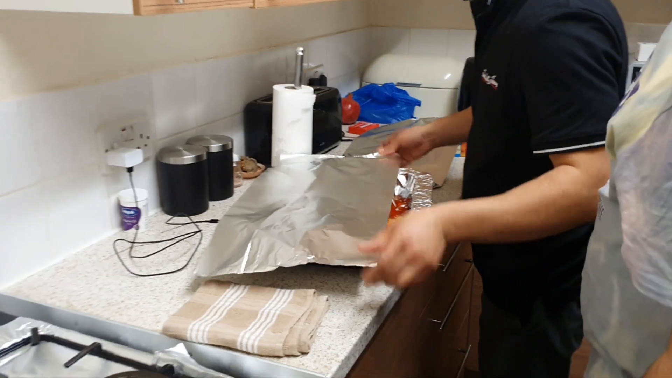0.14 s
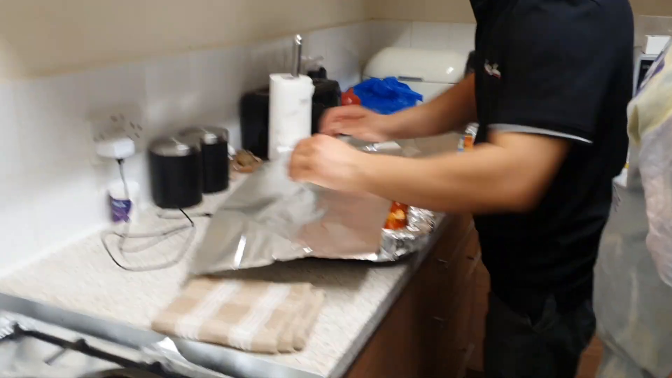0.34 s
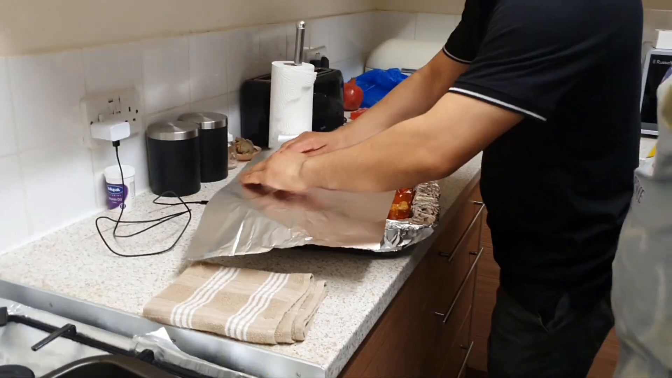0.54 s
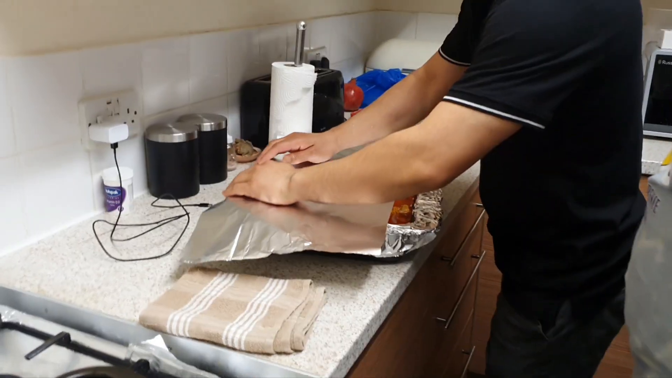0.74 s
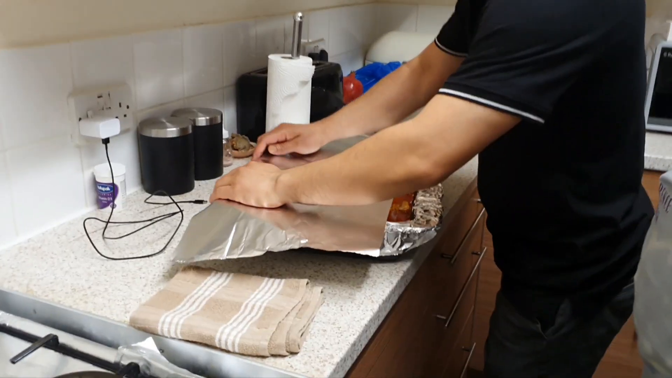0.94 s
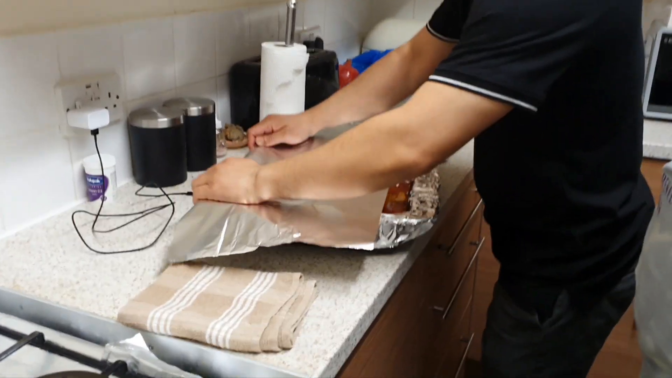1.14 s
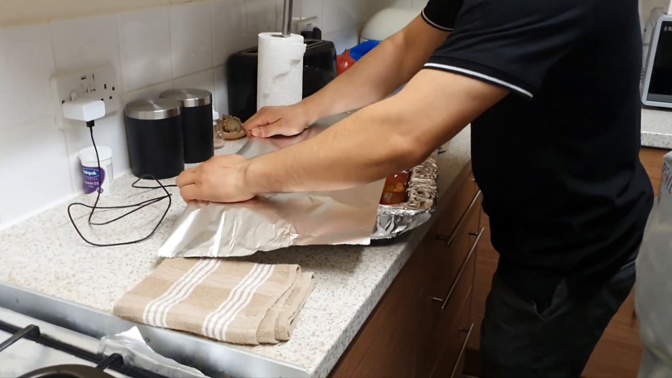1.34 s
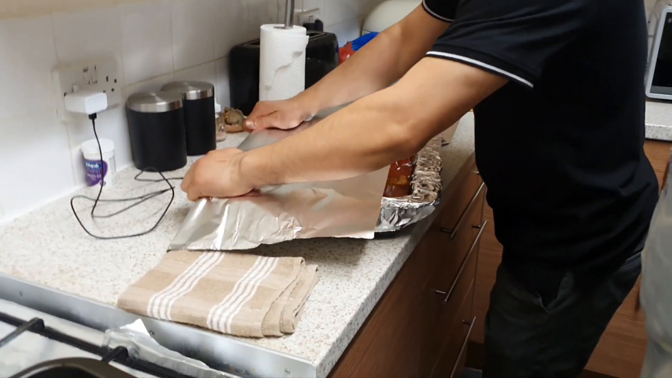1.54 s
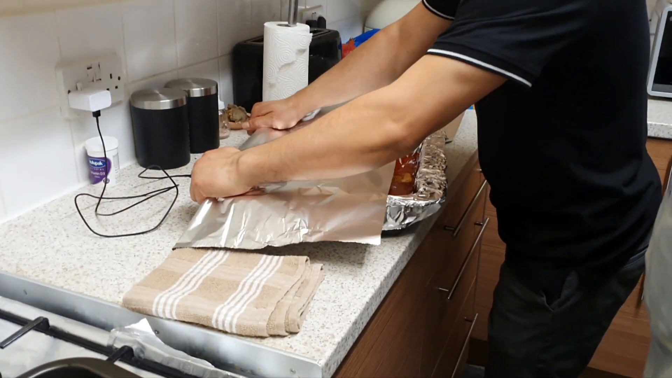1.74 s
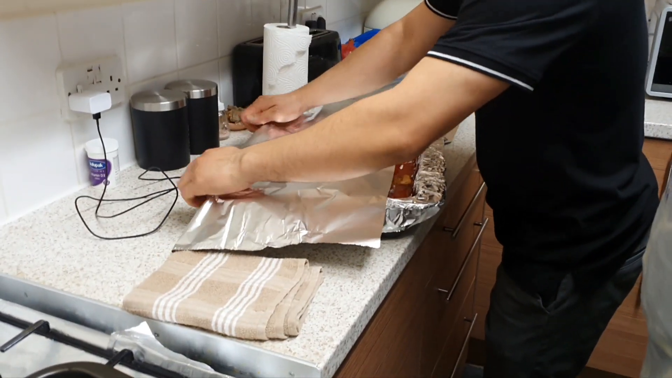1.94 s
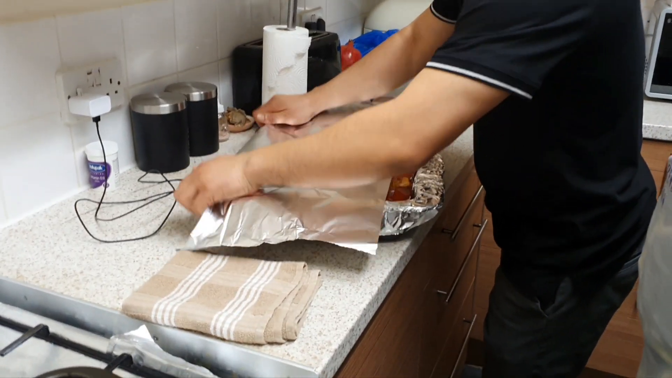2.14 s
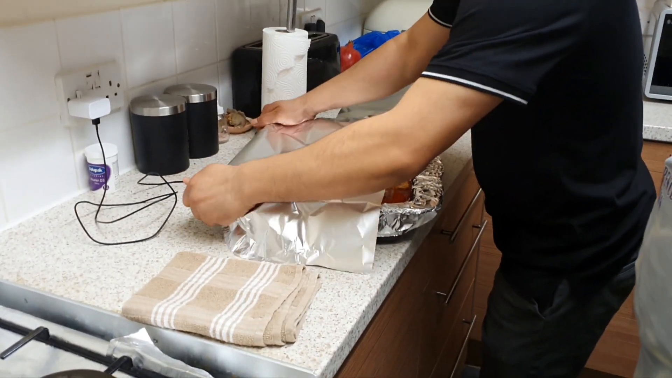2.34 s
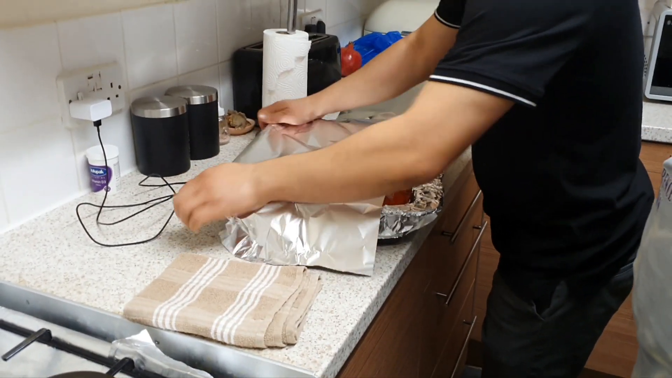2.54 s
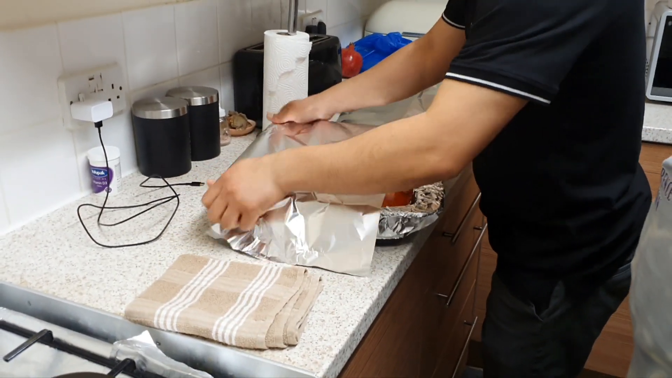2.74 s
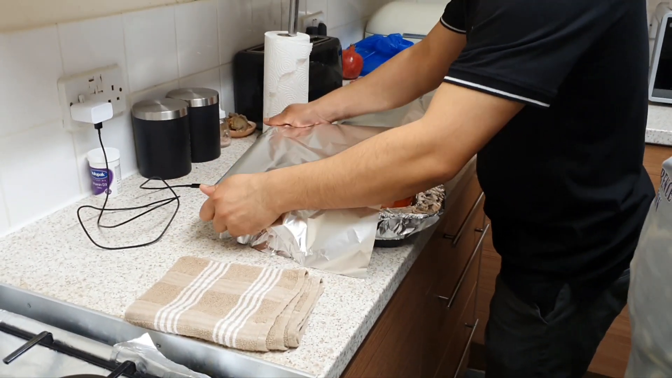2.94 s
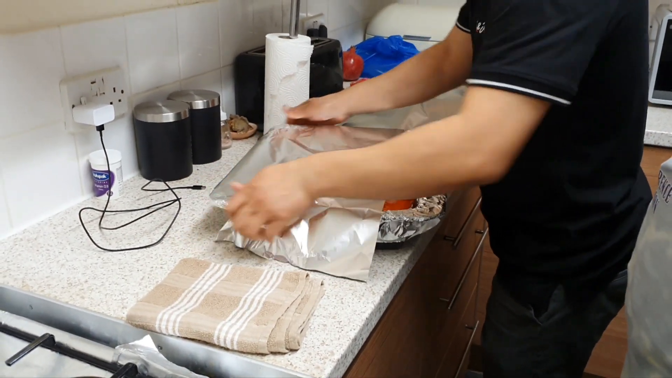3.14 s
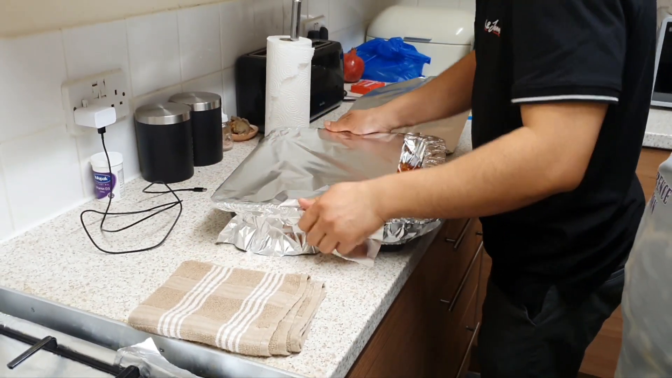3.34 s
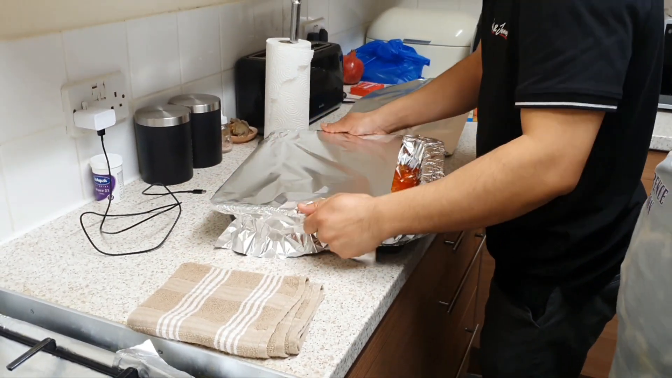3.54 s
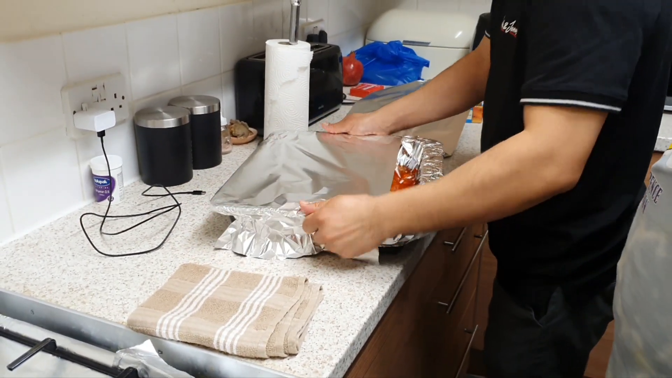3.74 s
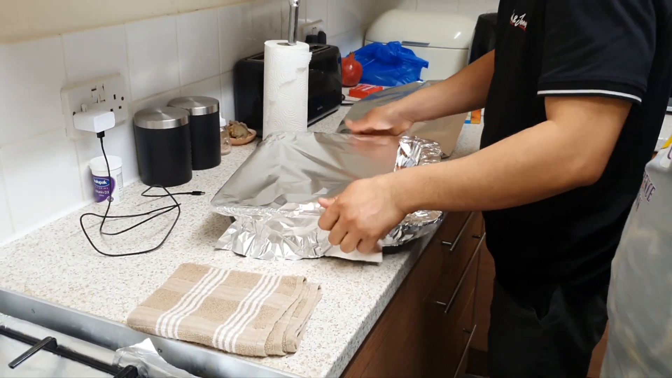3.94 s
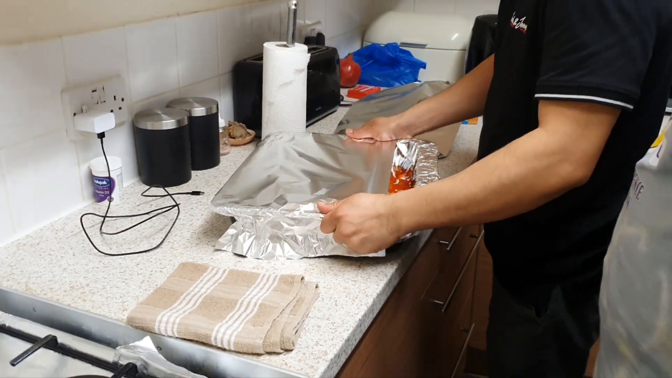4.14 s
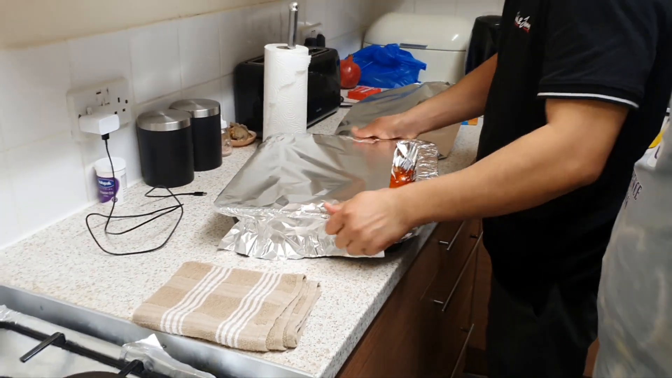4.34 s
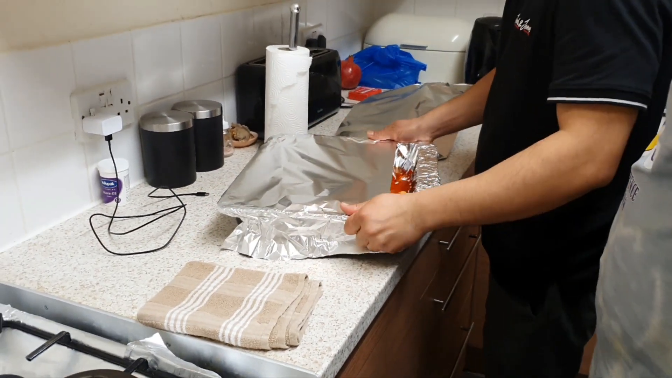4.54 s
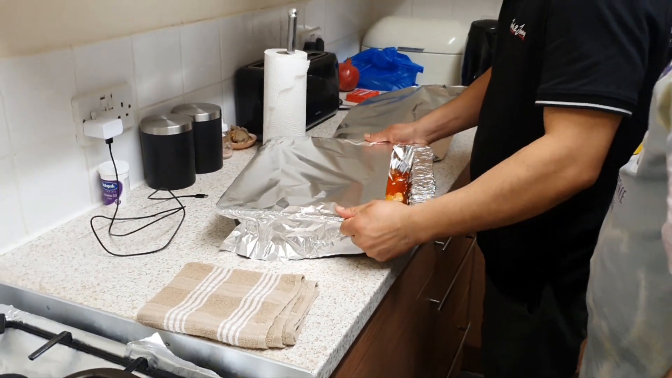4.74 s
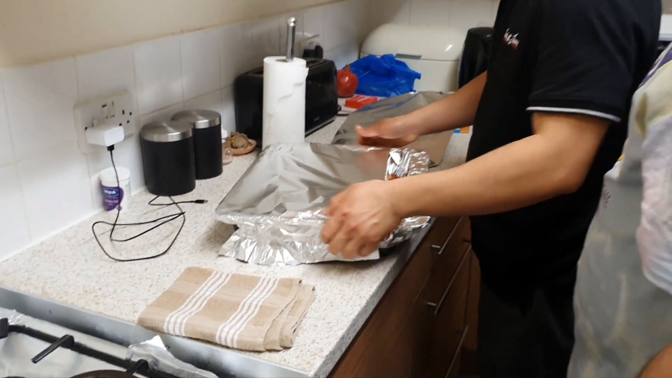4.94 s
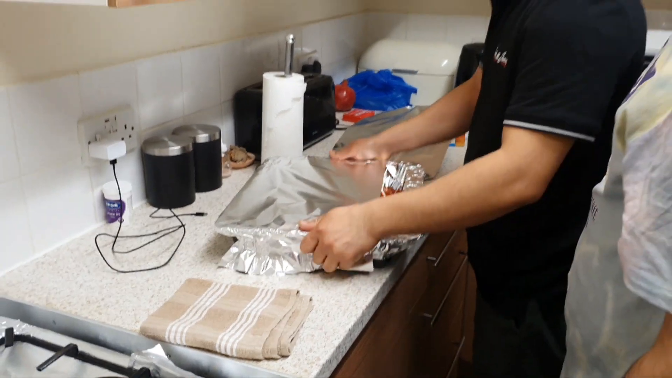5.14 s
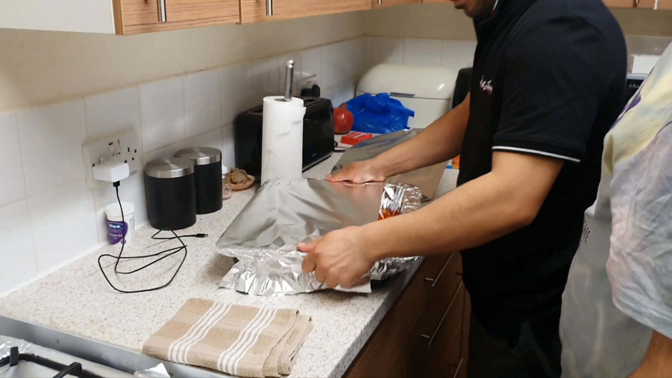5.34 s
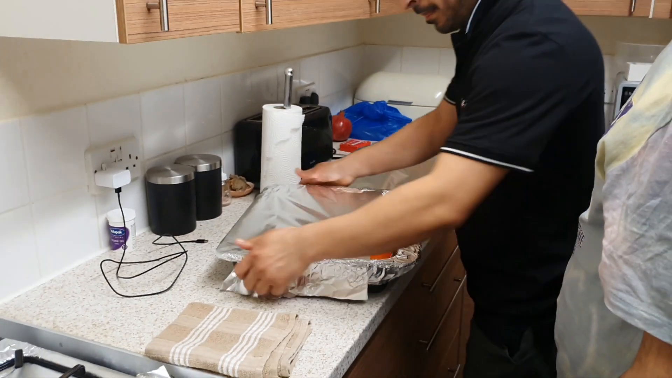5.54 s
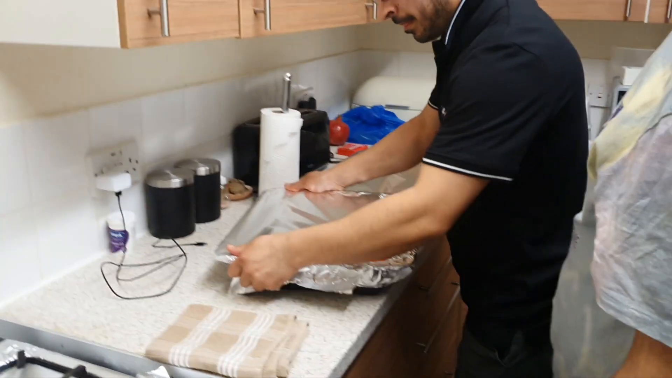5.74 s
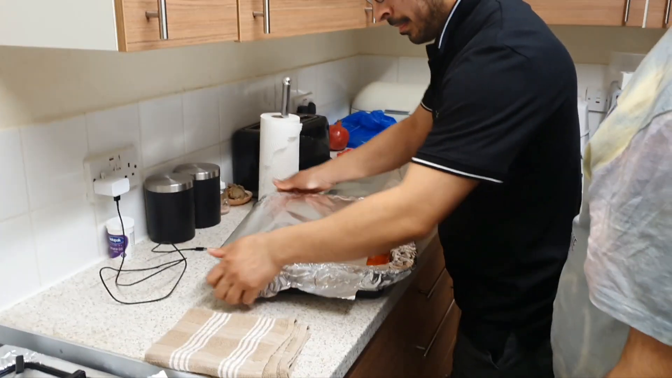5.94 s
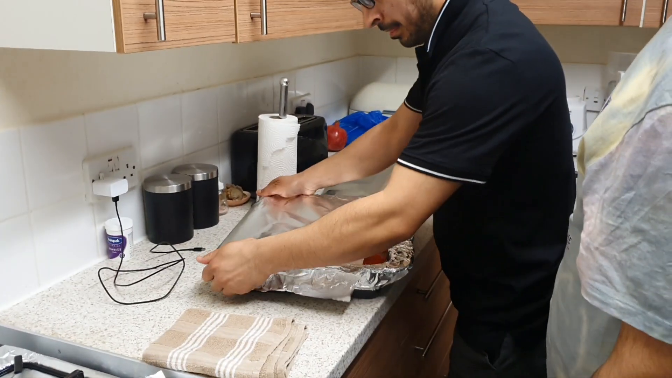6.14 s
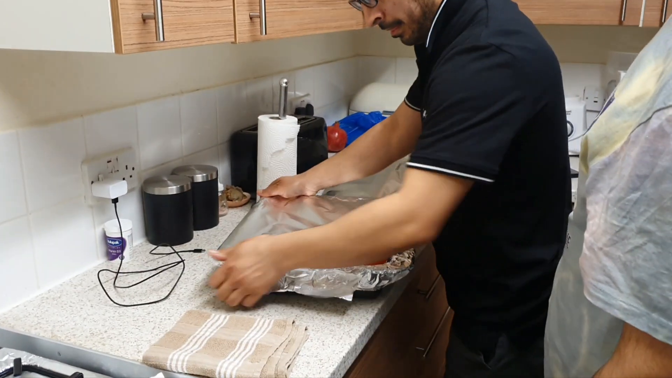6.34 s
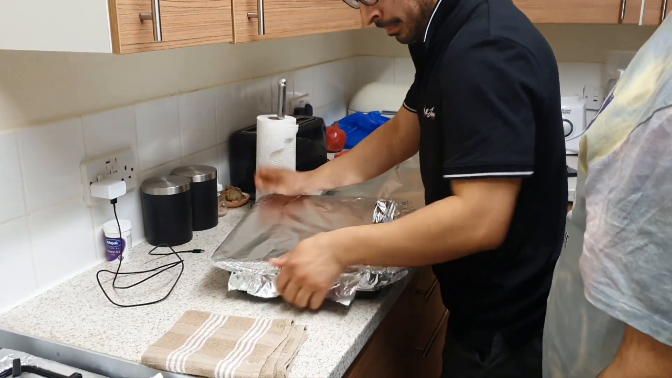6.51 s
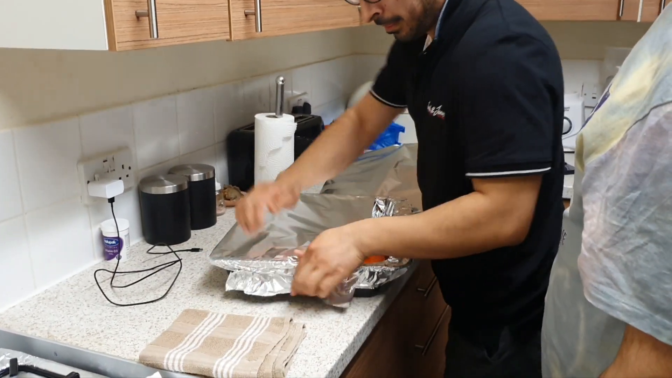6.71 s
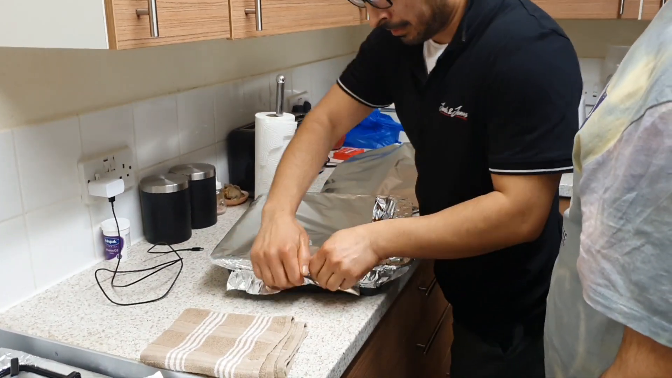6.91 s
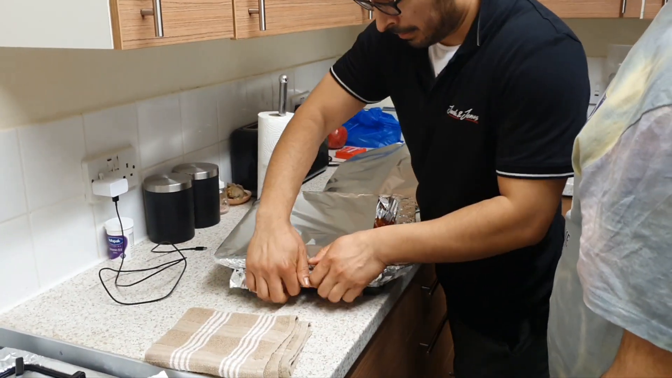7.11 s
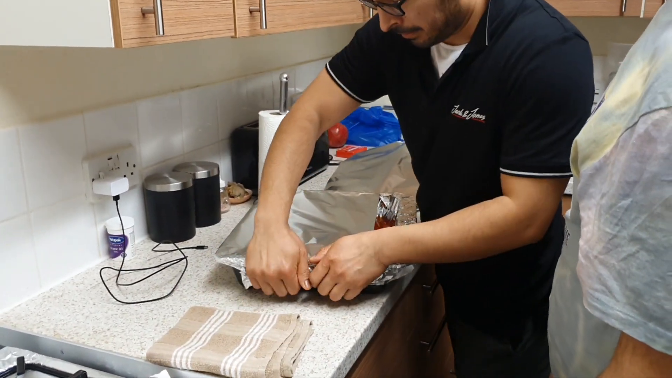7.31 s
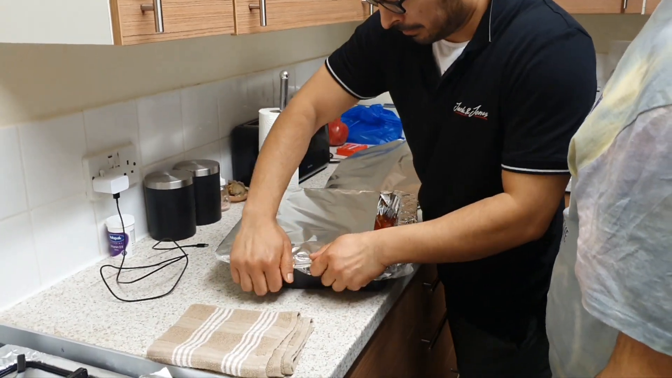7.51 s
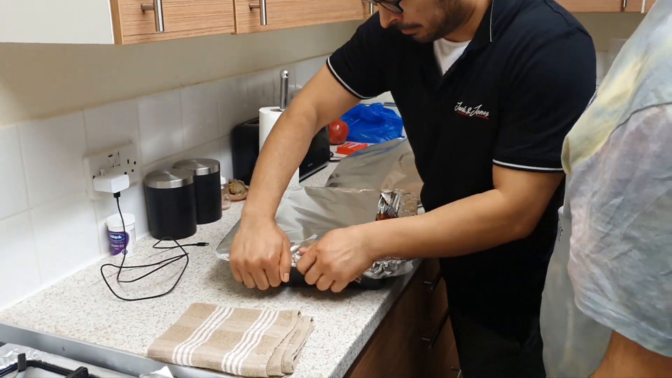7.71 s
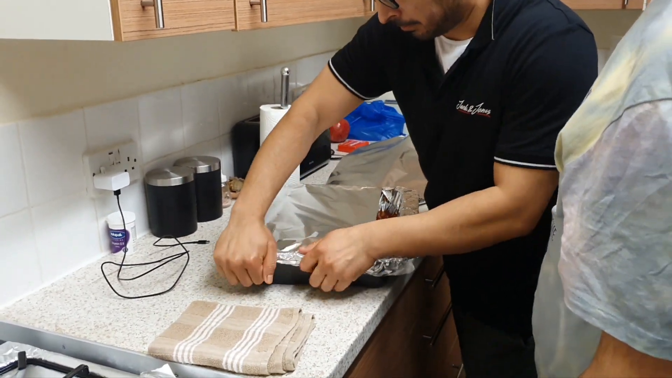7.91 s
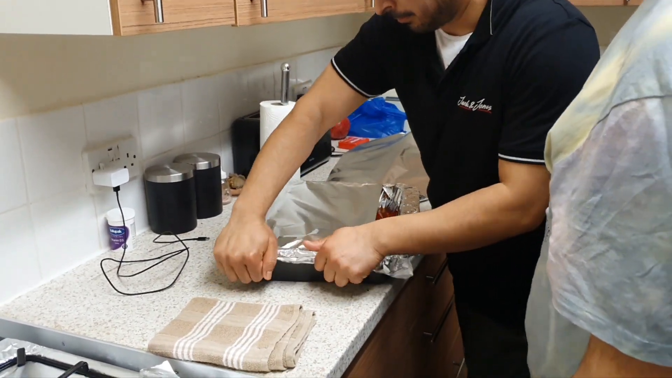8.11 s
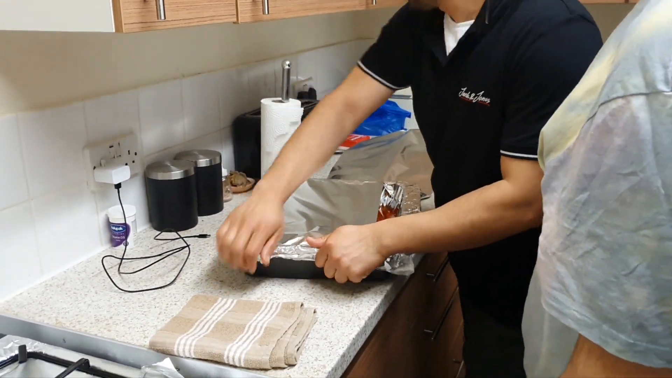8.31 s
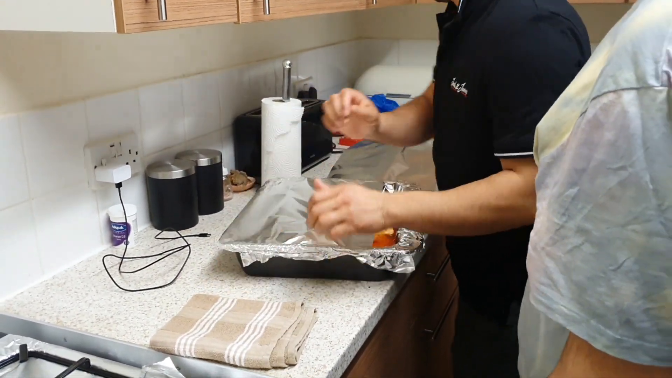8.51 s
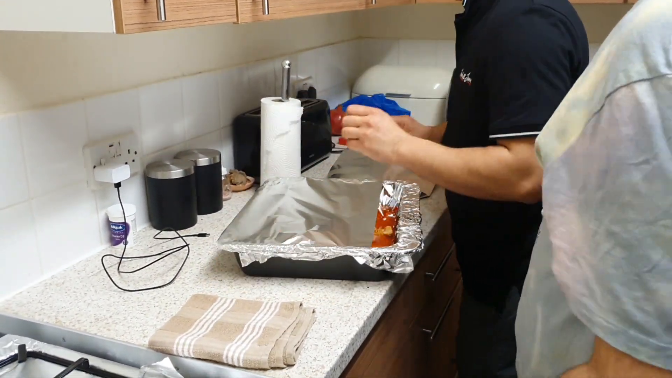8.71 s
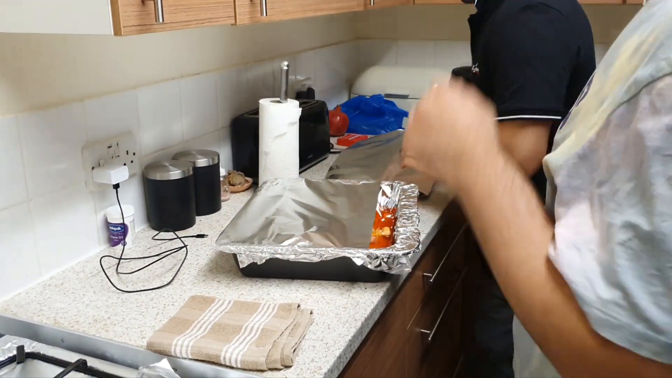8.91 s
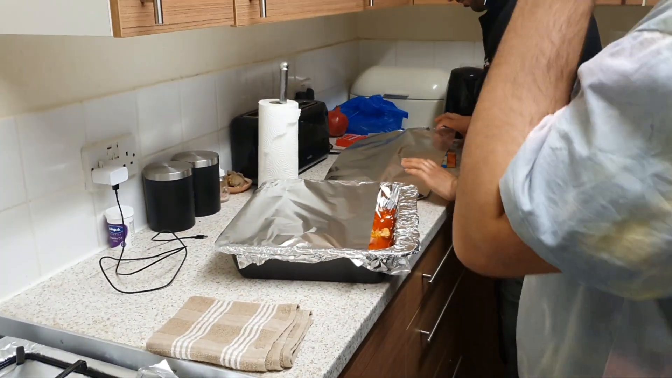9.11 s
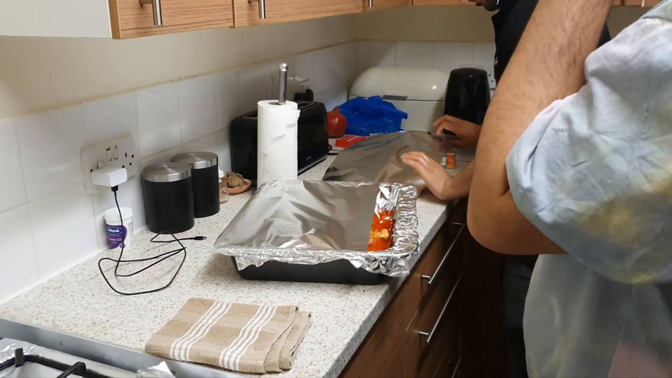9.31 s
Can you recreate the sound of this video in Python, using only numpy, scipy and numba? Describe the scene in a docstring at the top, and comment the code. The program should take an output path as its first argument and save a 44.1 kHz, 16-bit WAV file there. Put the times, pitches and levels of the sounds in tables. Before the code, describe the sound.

Crisp, uneven crinkling of aluminium foil comes from close by and slightly left, as it is smoothed and folded over a tray. Each grip sets off a spray of tiny snaps, loudest early in the middle, and later presses add soft thuds from the tray. The crackle thins out near the end. The small kitchen adds a brief echo, a quiet hum and a faint deep rumble that comes and goes.

```python
"""Crimping foil over a tray

Hands pull aluminium foil over a tray on a kitchen counter and crimp it round the rim. Thousands of
creases snap, each a short ring: small ones high, broad panels low. A grip sets off an avalanche of
snaps; a palm buckles the panels and thuds the tray. Tiled walls echo the foil over a quiet hum and
a deep rumble that comes and goes."""
import sys
import numpy as np
from scipy import signal
from scipy.fft import rfft, irfft, next_fast_len
from scipy.io import wavfile
from numba import njit

SR = 44100
rng = np.random.default_rng(int(sys.argv[2]) if len(sys.argv) > 2 else 0)


def wav_record(signal):
    """Record a signal, one row per channel, as 16-bit PCM in the file named by sys.argv[1]."""
    frames = np.transpose(np.atleast_2d(signal))
    bounded = np.clip(frames, -1, 1)
    # unit amplitude maps onto the largest positive 16-bit level
    quanta = np.round(bounded * 32767).astype(np.int16)
    wavfile.write(sys.argv[1], SR, quanta)


N = 417186

# Tone of the appliance hum: pitch_hz, gain_db
HUM_TONE = [(26, -35), (45, 7), (97, 5), (172, -1), (200, -9), (260, -27), (440, -120)]
# Tone of the room air: pitch_hz, gain_db
AIR_TONE = [(120, -31), (200, 6), (448, 4.5), (2470, -3), (6280, -12), (8270, -30), (16000, -30)]
# Noise bands of the rumble: pitch_hz, width_hz, level_db
RUMBLE_BANDS = [(37, 9, 0), (62, 25, -9)]
# Swells of the rumble: crest_s, gain_db
BOOMS = [(0.55, -70), (0.9, -83), (2.56, -71), (2.78, -69), (3.2, -58), (3.46, -56), (3.68, -61),
         (4.01, -63), (4.53, -57), (5.15, -50), (5.64, -53.5), (6.07, -52), (6.2, -56), (6.99, -61),
         (7.4, -60), (7.82, -55), (8.08, -65), (8.67, -77)]
# How much louder the left side is than the right: pitch_hz, difference_db
LEFT_OVER_RIGHT = [(60, 3.5), (110, -0.5), (200, 2.5), (380, 1), (700, 1.5), (1290, 4), (2380, 4),
                   (4400, 2.5), (8120, 7), (15000, 2)]
# Notes at which the tray rings: pitch_hz, width_hz, gain_db
TRAY_NOTES = [(381, 22, -8), (545, 18, -14.5), (778, 35, -10.5), (1066, 17, -30), (1185, 110, -5)]
# The tray knocking on the counter: start_s, level_db, pitch_hz
THUDS = [(2.125, -42.5, 176), (4.971, -30, 221), (5.454, -34, 251), (7.098, -45, 200), (8.165, -52, 154)]
# Fingers gripping the foil: start_s, level_db, fine_db (finest creases, relative to the avalanche)
GRIPS = [(0.4449, -25, 3), (1.1657, -24, -0.5), (1.4062, -34, -8), (1.7579, -31, 1), (1.9582, -45, -2.5),
         (2.0162, -22.5, 3), (2.1249, -11.5, 0.5), (2.3411, -23, -2), (2.363, -31, -9), (2.5686, -33, -8),
         (2.5951, -9, -3.5), (2.8706, -29, 6), (2.9093, -24, -9.5), (3.0724, -29, 1), (3.1713, -10, -2),
         (3.4312, -22.5, 6), (3.6396, -40, -2), (3.7701, -23, -16), (3.8218, -40, -5), (4.0816, -19, -15),
         (4.2366, -24, -1), (4.3241, -27, 5), (4.3727, -23, -4), (4.5202, -29, -9), (4.7403, -25, -11),
         (4.8729, -32.5, 1), (4.9661, -14, -16), (5.2672, -22, -2.5), (5.4118, -21, -5), (5.444, -31, -10),
         (5.7386, -25, -5.5), (5.8936, -34, -18), (5.9106, -29, -23), (6.235, -23, -4), (6.5979, -27, -8),
         (6.6318, -21, -7), (6.7801, -21.5, -6), (7.012, -31, -8), (7.0501, -26.5, -5), (7.0873, -26, -15),
         (7.1, -32, -18), (7.306, -18, -8), (7.4133, -31, -5), (7.9154, -42, -9), (7.9874, -15, -3),
         (8.8943, -36, 0), (9.177, -33, 10), (9.3419, -16.5, -10)]
# Broad panels buckling against the tray: start_s, level_db, pitch_hz
BUCKLES = [(0.843, -22, 940), (1.107, -24.5, 880), (1.435, -26, 710), (2.087, -32, 1510),
           (2.123, -12, 1840), (2.14, -12.5, 1060), (2.179, -15, 680), (2.199, -13, 875),
           (2.229, -14.5, 1035), (2.363, -11.5, 1450), (2.374, -11.5, 1290), (2.567, -11, 1249),
           (2.596, -8, 1530), (3.07, -11, 2160), (3.169, 1, 2500), (3.184, -9, 2480), (3.199, -9, 2820),
           (3.22, -7, 2780), (3.249, -19.5, 517), (3.312, -18, 734), (3.344, -22, 764), (3.434, -24, 2880),
           (3.769, -22.5, 750), (3.819, -20, 1090), (4.206, -26, 1250), (4.482, -35, 812),
           (4.967, -16, 620), (4.98, -32, 530), (4.997, -19.5, 380), (5.049, -23, 362), (5.09, -21, 2460),
           (5.4117, -12, 2140), (5.445, -12, 660), (5.599, -16.5, 1210), (5.912, -8, 1110),
           (5.949, -27, 800), (6.184, -20, 2120), (6.249, -17, 2870), (6.464, -17, 1850), (6.63, -20, 1335),
           (6.649, -29, 1234), (6.735, -21, 1840), (6.799, -17.5, 2020), (7.011, -22, 3750),
           (7.099, -22, 440), (7.16, -14, 794), (7.178, -9.5, 1175), (7.329, -15.5, 970),
           (7.412, -11, 3820), (7.58, -23, 522), (7.601, -23, 716), (7.983, -23, 3270), (8.473, -35.5, 620),
           (8.519, -39, 420), (8.903, -36, 1610)]
# Palms pressing the panels down: start_s, level_db, pitch_hz, ring_db (extra ring at that pitch)
PRESSES = [(2.091, -32, 880, -3), (3.23, -33, 690, -5), (3.3, -35, 770, 3), (3.78, -38.5, 810, -3),
           (4.1, -46.5, 806, 16), (4.46, -44.5, 810, 10), (4.54, -36, 815, 6), (4.964, -22, 628, 5.5),
           (5.443, -24, 755, 2), (5.908, -30.5, 780, 6.5), (5.97, -40.5, 760, 3), (6.91, -42, 380, 1),
           (7.098, -29, 560, 0), (7.162, -27, 394, 9.5), (7.582, -31.5, 530, 3.5), (8.47, -60, 480, 9)]
# Hand strokes: start_s, length_s, level_db, swell_db, panel_db, fine_db, span_hz, panel_hz
# panel_db and fine_db are relative to level_db; the span is the free foil between the hands.
STROKES = [(0, 0.15, -39.5, -6.5, -11, -9, 3100, 780), (0.458, 0.14, -35, -1.5, -10.5, -5.5, 3350, 814),
           (0.666, 0.065, -41, 5, -12.0, -3.5, 3300, 800), (0.779, 0.17, -39.5, 4.5, -9, -3, 3280, 816),
           (1.011, 0.32, -36.5, 1, -9, -5, 3100, 835), (1.118, 0.17, -38, -6.5, -7, -3, 2500.0, 850.0),
           (1.389, 0.2, -38.5, 6.5, -7.5, -3.5, 3160, 745), (1.724, 0.053, -47.5, 9, -7, -3.5, 3300, 820),
           (1.961, 0.052, -44, 7.5, -8.5, -2, 2500.0, 850.0),
           (2.016, 0.21, -36.5, 6, -6, -2.5, 2640, 910.0), (2.318, 0.058, -37.5, 7.0, -7, -6, 2210, 970.0),
           (2.567, 0.23, -32, 0, -6, -4.5, 2250, 950), (2.872, 0.094, -40.5, 4.5, -6.5, -7.5, 2450, 980),
           (3.067, 0.026, -43.5, 9.5, -6.5, -8.5, 2430, 870), (3.106, 0.12, -34, 6, -2, -0.5, 2600.0, 910),
           (3.292, 0.1, -39.5, 5.5, -9.5, -3.5, 2500.0, 850.0),
           (3.434, 0.16, -35, -12, -4.5, -5, 2760, 840),
           (3.624, 0.15, -40.5, -0.5, -7.5, -2.5, 2990.0, 880.0),
           (3.823, 0.21, -35, 1, -4, -2.5, 2720.0, 780), (4.15, 0.086, -44.5, 7, -13, -3.5, 2910.0, 830.0),
           (4.325, 0.25, -42, 4, -6.5, -5.5, 2290, 810.0), (4.685, 0.067, -52, 11, -11.0, -5.5, 2760, 816),
           (4.881, 0.034, -44, 3.5, -11.5, -6, 2500.0, 850.0), (4.941, 0.2, -36.5, 2, -10, -4, 2120, 704),
           (5.233, 0.096, -40.5, -1, -17, -8, 2990.0, 840.0),
           (5.417, 0.013, -37.5, -17, -16.5, -3, 2500.0, 850.0),
           (5.448, 0.1, -30.5, -15, 5.5, -6, 1750.0, 760.0),
           (5.523, 0.074, -32, 2, -6, -4.0, 2320.0, 830.0),
           (5.725, 0.074, -40.5, 0.0, -7.5, -7, 2570, 840.0), (5.9, 0.094, -40.5, 9, -8.5, -6.0, 2350, 780),
           (6.18, 0.041, -44.5, 5, -9.5, -5, 2470.0, 1010), (6.352, 0.14, -43, 1.5, -11, -6.5, 2440, 960),
           (6.6, 0.051, -47, 9.5, -7.5, -4, 2350, 1010), (6.733, 0.13, -41, -5.5, -7, -4.5, 2360.0, 810),
           (6.89, 0.033, -49.0, 8, -6, -1, 2440.0, 605), (6.994, 0.092, -49, -5, -15.0, 0, 3310.0, 600.0),
           (7.098, 0.35, -35, -6, 0.5, -4.5, 2310.0, 740), (7.484, 0.15, -36.5, -4, -10, -2, 2560.0, 640.0),
           (7.665, 0.17, -36.5, -2.0, -6, -5.0, 2570, 740), (7.914, 0.41, -40, -3.0, -11, -6, 2980, 800),
           (7.985, 0.028, -31.0, -2.5, -8, -2.5, 2500.0, 850.0),
           (8.695, 0.065, -58.5, 6.5, -26, -22, 2850.0, 620.0),
           (8.904, 0.13, -42, -1, -20, -13, 2900.0, 880.0), (9.176, 0.046, -41, 7, -23, -7, 3100.0, 870.0),
           (9.287, 0.157, -36, 5, -20, -8, 2800, 1050)]
# Boost for snaps near the pitch of the span: time_s, boost_db
SPAN_BOOST = [(0, 2.5), (1.8, 2.5), (2.2, 3), (3.2, 4), (4.5, 4.5), (5.5, 2.5), (6.5, 5), (7.5, 4),
              (8.5, 0), (9.46, 3.5)]
# Overall tone of the crackle: pitch_hz, gain_db
FOIL_TONE = [(71, -53), (120, -32.5), (341, -12.5), (378, -12.5), (410, -11), (524, -8), (617, -9),
             (727, -6), (1100, -5), (1900, -4.5), (3110, -3.5), (4060, -5.5), (6630, -5.5), (8140, -14),
             (12800, -7), (16000, -6.5)]

SNAPS_PER_S, PANEL_EDGE_HZ, FINE_EDGE_HZ = 16000, 1610, 7400
ATTACK_DB_PER_S, BLOW_S = 1000, 0.025
AVALANCHE_DB, AVALANCHE_S = -14.5, 0.12  # starts below the grip's level, then fades by 60 dB


def undb(db):
    """Turn decibels into a gain."""
    return 10 ** (np.asarray(db) / 20)


def set_level(x, db):
    """Scale a sound to an average (rms) level."""
    return x * undb(db) / np.sqrt(np.mean(x ** 2))


def colour(x, table):
    """Turn pitches up or down along a curve of (pitch_hz, gain_db) points."""
    hz, db = np.transpose(table)
    size = next_fast_len(x.shape[-1])
    bin_hz = np.arange(size // 2 + 1) * SR / size + 1
    gain = undb(np.interp(np.log(bin_hz), np.log(hz), db))
    return irfft(rfft(x, size) * gain, size)[..., :x.shape[-1]]


def envelope(t, start, length, db, swell_db, rise, fall):
    """Power of each event: it rises, changes by swell_db, then falls (rise and fall in dB per second)."""
    progress = np.clip((t - start) / np.maximum(length, .005), 0, 1)
    before, after = np.maximum(start - t, 0), np.maximum(t - start - length, 0)
    return undb(db + swell_db * progress - rise * before - fall * after) ** 2


def right_delays(count, mean_s=0.000296, spread_s=0.00008):
    """Samples by which the right side hears each snap later; each sits elsewhere on the sheet."""
    return SR * (mean_s + spread_s * rng.standard_normal(count))


@njit
def rings(start_s, hz, cycles, size, delay):
    """Add up sine waves in stereo; each rises over about one cycle and dies away over `cycles`."""
    out = np.zeros((2, N))
    for k in range(len(start_s)):
        pole = 2j * np.pi * hz[k] / SR - 7 * hz[k] / SR / cycles[k]
        wave_step, onset_step = np.exp(pole), np.exp(-hz[k] / SR)
        for side in range(2):
            at = start_s[k] * SR + side * delay[k]
            first = int(at) + 1
            wave, onset = size[k] * np.exp(pole * (first - at)), onset_step ** (first - at)
            for j in range(max(first, 0), min(first + int(cycles[k] * SR / hz[k]) + 2, N)):
                out[side, j] += wave.imag * (1 - onset)
                wave *= wave_step
                onset *= onset_step
    return out


def background(tone, db, width):
    """Steady hum or room air: noise shared by both sides, plus some (width) of each side's own."""
    noise = rng.standard_normal(N) + width * rng.standard_normal((2, N))
    return set_level(colour(noise, tone), db)


def rumble():
    """Very low noise that swells now and then."""
    deep = 0
    for hz, width, db in RUMBLE_BANDS:
        band = signal.butter(2, (hz - width / 2, hz + width / 2), "bandpass", fs=SR, output="sos")
        deep += set_level(signal.sosfilt(band, rng.standard_normal(N)), db)
    t = np.arange(0, N, 100) / SR
    crest, db = np.transpose(BOOMS)[:, :, None]
    swell = envelope(t, crest, 0, db, 0, rise=87, fall=115).sum(0)
    return deep * np.interp(np.arange(N) / SR, t, np.sqrt(swell))


def kitchen_echo(x, count=7, round_s=0.3, low_fade_s=0.21, high_fade_s=0.13, gain_db=-1.5):
    """Hard walls give a dense echo, treble dying first; it changes as hands and bodies move about."""
    t = np.arange(SR // 3) / SR
    out = 0
    for k in range(count):
        noise = rng.standard_normal((2, len(t)))
        low = signal.lfilter(*signal.butter(1, 2000, fs=SR), noise)
        tail = low * undb(-60 * t / low_fade_s) + (noise - low) * undb(-60 * t / high_fade_s)
        tail *= np.clip(t / 0.0019, 0, 1)
        tail /= np.sqrt(np.sum(tail ** 2) / 2)
        # the echoes take turns, keeping the total power steady
        turn = (np.arange(N) / SR / round_s - k / count) % 1
        share = np.cos(np.pi / 2 * np.clip(count * np.minimum(turn, 1 - turn), 0, 1))
        out += signal.oaconvolve(x * share, tail, axes=1)[:, :N]
    return undb(gain_db) * out


def tray_ring(sheet):
    """The covered tray rings faintly along with the sheet."""
    return sum(undb(db) * signal.lfilter(*signal.iirpeak(hz, hz / width, fs=SR), sheet)
               for hz, width, db in TRAY_NOTES)


def tray_thuds(cycles=36.0):
    """A palm press knocks the tray against the counter and it rings low."""
    start, db, hz = np.transpose(THUDS)
    return rings(start, hz, np.full(len(hz), cycles), undb(db), right_delays(len(hz)))


def grip_cracks(count=5, cycles=4.6, gain_db=-2.5):
    """The first crease of each grip gives way with a sharp crack: several short rings at once."""
    start, db, _ = np.repeat(GRIPS, count, axis=0).T
    octaves = 1.5 * (np.arange(count) + rng.random((len(GRIPS), count))) / count
    hz = 1500 * 2 ** octaves.ravel()
    return rings(start, hz, np.full(len(hz), cycles), undb(db + gain_db), right_delays(len(hz)))


def panel_buckles(count=24, rattle_s=0.044, rattle_octaves=0.3, rattle_db=-11.5):
    """A panel buckles with one strong pop at its own pitch, then weaker pops rattle away."""
    start, db, panel_hz = np.transpose(BUCKLES)[:, :, None]
    when, strength, length = rng.random((len(BUCKLES), count, 3)).transpose(2, 0, 1)
    is_rattle = np.arange(count) > 0
    late = is_rattle * when ** 2
    octaves = is_rattle * rattle_octaves * rng.standard_normal(late.shape)
    hz = np.clip(panel_hz * 2 ** octaves, 200, 6000)
    size = undb(db - 15 * late) * np.where(is_rattle, undb(rattle_db) * (2 * strength - 1), 1)
    pop_s = start + late * rattle_s
    cycles = 19.6 * (0.17 + length)
    pops = rings(pop_s.ravel(), hz.ravel(), cycles.ravel(), size.ravel(), right_delays(late.size))
    # thin panels give off no deep bass
    return signal.sosfilt(signal.butter(3, 260, "high", fs=SR, output="sos"), pops)


def hand_effort(snap_s):
    """Strokes, palms and grips set the foil's power and pitch at each snap; louder ones count more."""
    t = np.arange(N // 44 + 2) * 44 / SR
    start, length, db, swell_db, panel_db, fine_db, span_hz, panel_hz = np.transpose(STROKES)[:, :, None]
    strokes = envelope(t, start, length, db, swell_db, ATTACK_DB_PER_S, fall=113)
    broad = envelope(t, start, length, db + panel_db, swell_db, ATTACK_DB_PER_S, fall=115)
    fine = envelope(t, start, length, db + fine_db, swell_db, ATTACK_DB_PER_S, fall=157)
    # a palm gives a short blow, then the panels settle
    start, db, press_hz, ring_db = np.transpose(PRESSES)[:, :, None]
    blow = envelope(t, start, BLOW_S, db, 0, 10 * ATTACK_DB_PER_S, fall=400)
    settle = envelope(t, start, 0, db - 4, 0, 10 * ATTACK_DB_PER_S, fall=93)
    presses = blow + settle
    crackle, panels = strokes.sum(0), broad.sum(0) + presses.sum(0)
    span_hz = (strokes * span_hz).sum(0) / crackle
    panel_hz = ((broad * panel_hz).sum(0) + (presses * press_hz).sum(0)) / panels
    ring_db = (presses * ring_db).sum(0) / panels
    curves = crackle, panels, fine.sum(0), span_hz, panel_hz, ring_db
    crackle, panels, fine, span_hz, panel_hz, ring_db = (np.interp(snap_s, t, c) for c in curves)
    for start, db, fine_db in GRIPS:
        during = slice(*np.searchsorted(snap_s, (start, start + AVALANCHE_S)))
        avalanche = undb(db + AVALANCHE_DB - 60 * (snap_s[during] - start) / AVALANCHE_S) ** 2
        crackle[during] += avalanche
        fine[during] += avalanche * undb(fine_db) ** 2
    return crackle, panels, fine, span_hz, panel_hz, ring_db


def nearness(hz, centre_hz, octaves):
    """A bell curve: 1 at the centre pitch, fading to 0 away from it."""
    return np.exp(-(np.log2(hz / centre_hz) / octaves) ** 2)


def foil_crackle():
    """Creases of every size snap and ring briefly; a few are far stronger than the rest."""
    count = SNAPS_PER_S * N // SR
    when, pitch, strength, direction, length = rng.random((count, 5)).T
    snap_s = (np.arange(count) + when) / SNAPS_PER_S
    hz = 120 + 16500 * pitch ** 1.3114
    crackle, panels, fine, span_hz, panel_hz, ring_db = hand_effort(snap_s)
    # low snaps follow the broad panels, high snaps the finest creases
    low_db = (10 * np.log10(panels / crackle) + 4) / (1 + (hz / PANEL_EDGE_HZ) ** 2.75)
    high_db = (10 * np.log10(fine / crackle) + 4.5) / (1 + (FINE_EDGE_HZ / hz) ** 8)
    # snaps near the pitch of the span or the panels are louder
    span_db = np.interp(snap_s, *np.transpose(SPAN_BOOST)) * nearness(hz, span_hz, 0.84)
    hollow_db = 4.5 * nearness(hz, panel_hz, 0.64)
    scatter_db = -2 * np.log(strength + 0.0043)
    size = np.sqrt(crackle) * undb(low_db + high_db + span_db + hollow_db + scatter_db)
    size *= (hz / 3000) ** 0.57  # shorter rings carry less energy, so high snaps start stronger
    # under a palm, snaps at the panels' pitch ring louder and longer
    ring = undb(ring_db * nearness(hz, panel_hz, 0.07))
    size *= np.sqrt(ring) * np.sign(direction - .5)
    cycles = ring * 9.57 * (0.37 + length)
    return undb(9.5) * colour(rings(snap_s, hz, cycles, size, right_delays(count)), FOIL_TONE)


def scene():
    """Foil, tray and echo over hum, room air and rumble, all louder on the left."""
    sheet = foil_crackle() + panel_buckles() + grip_cracks()
    sheet += tray_ring(sheet)
    mix = tray_thuds() + sheet + kitchen_echo(sheet)
    mix += background(HUM_TONE, db=-69.5, width=0.61) + background(AIR_TONE, db=-62.5, width=1.2)
    left, right = mix + rumble()
    balance = np.array(LEFT_OVER_RIGHT)
    return np.array([colour(left, balance * [1, .5]), colour(right, balance * [1, -.5])])


def record(dry, top_hz=15850):
    """The phone cuts the highest treble steeply."""
    return signal.sosfilt(signal.ellip(14, .2, 95, top_hz, fs=SR, output="sos"), dry)


dry = scene()
out = record(dry)
wav_record(out)
```